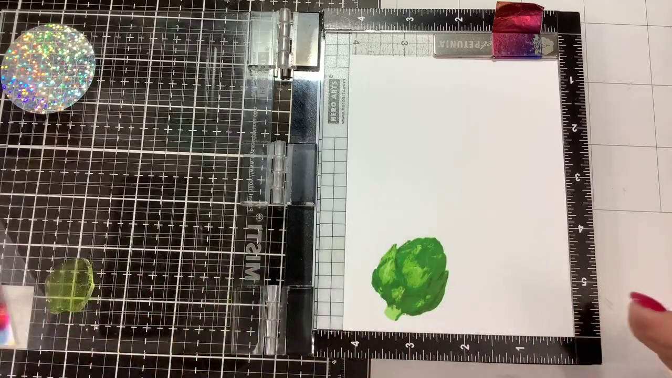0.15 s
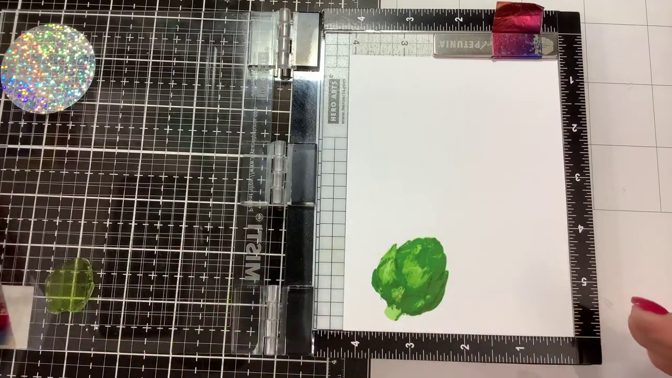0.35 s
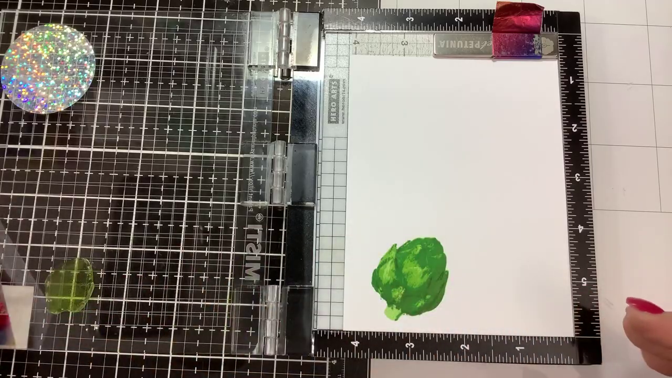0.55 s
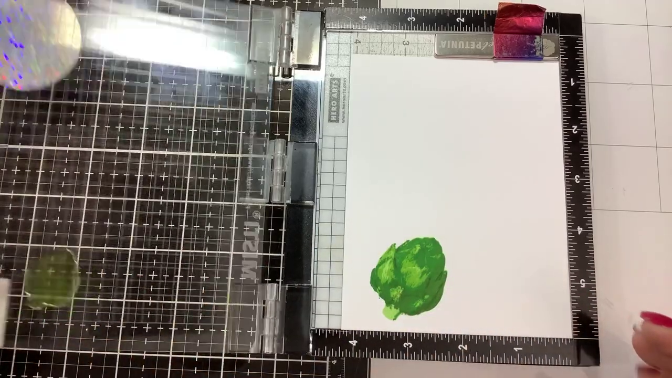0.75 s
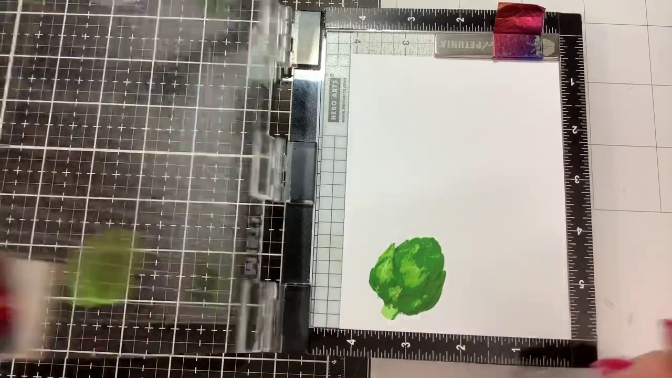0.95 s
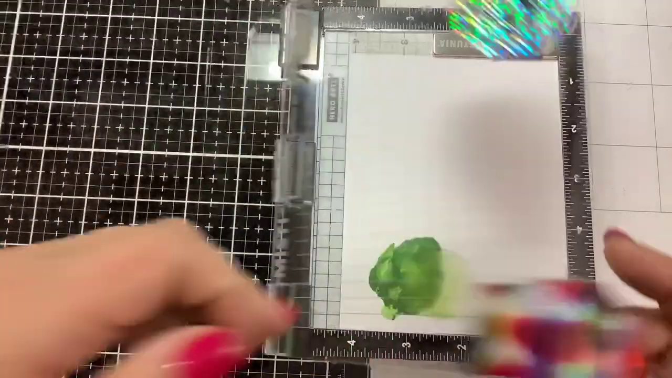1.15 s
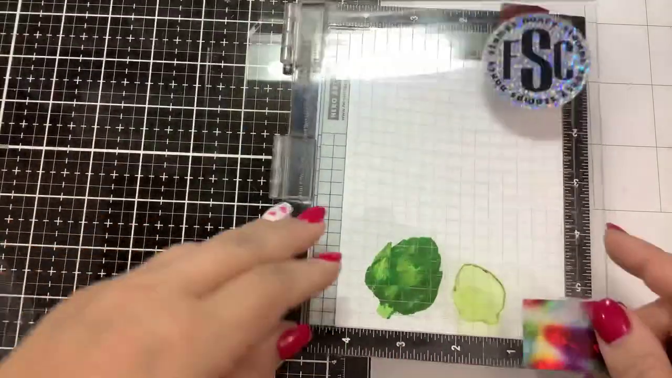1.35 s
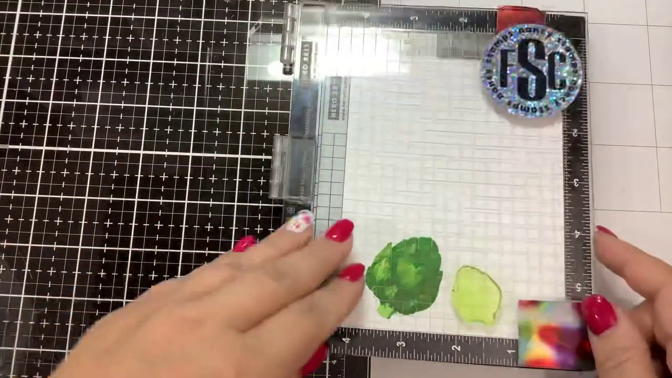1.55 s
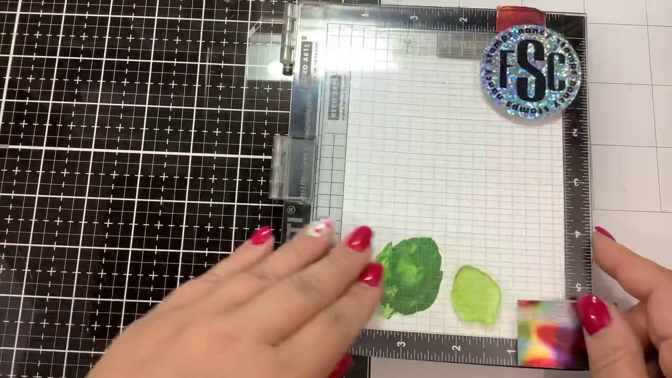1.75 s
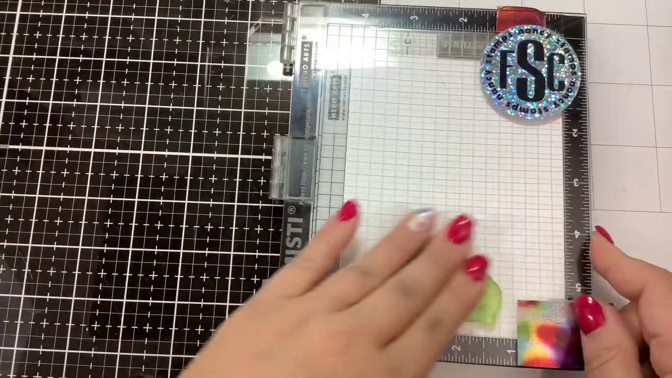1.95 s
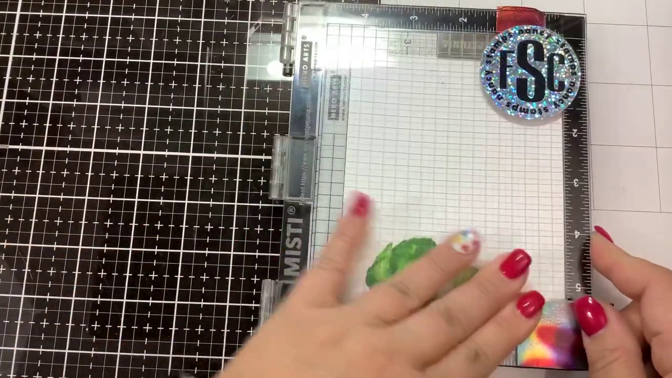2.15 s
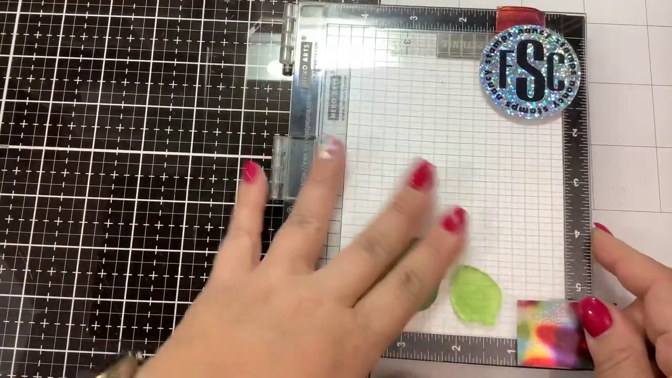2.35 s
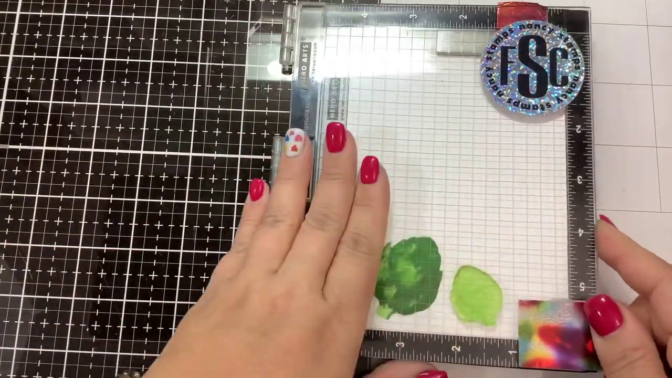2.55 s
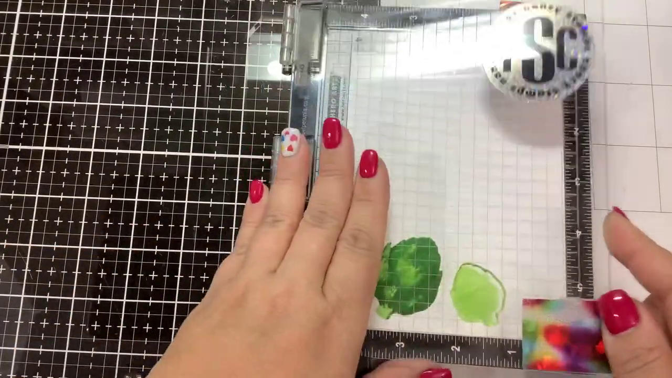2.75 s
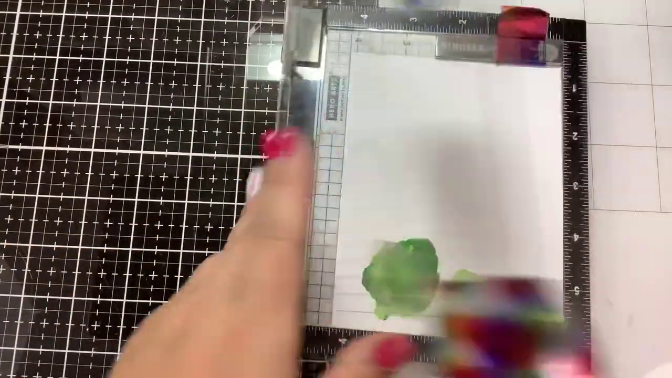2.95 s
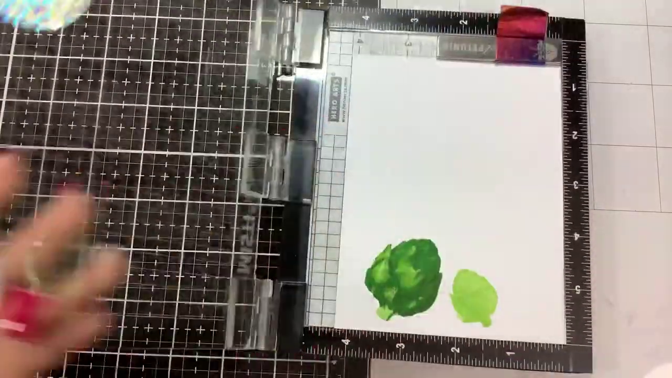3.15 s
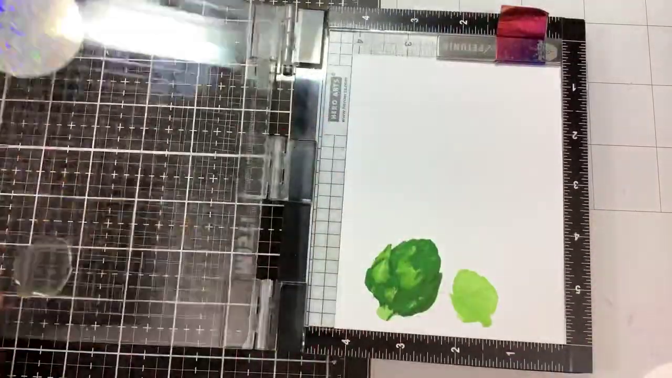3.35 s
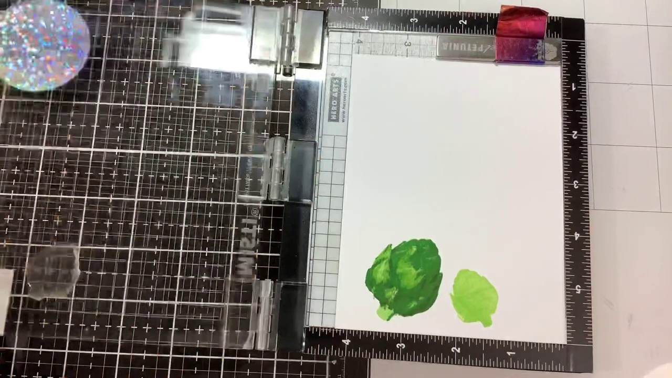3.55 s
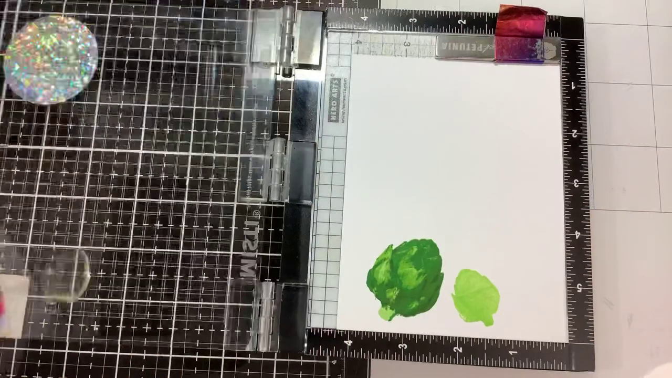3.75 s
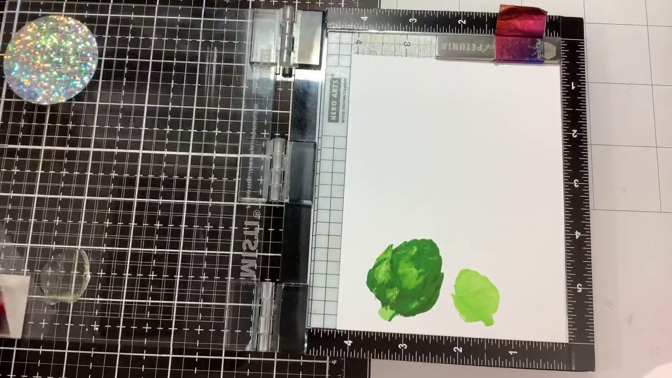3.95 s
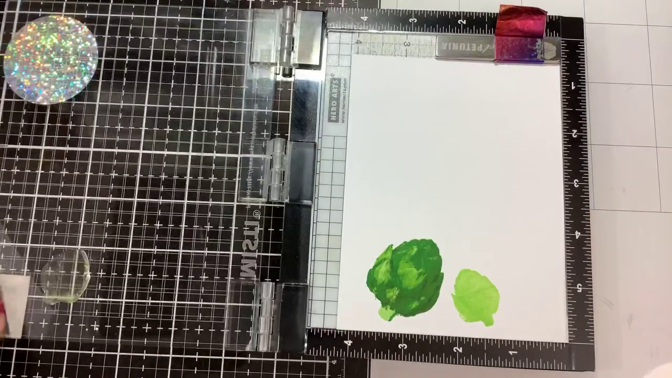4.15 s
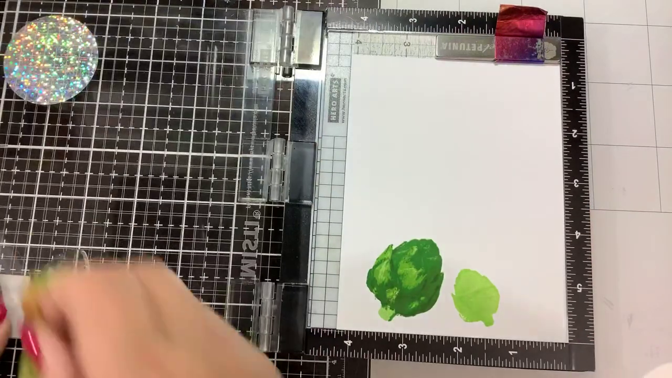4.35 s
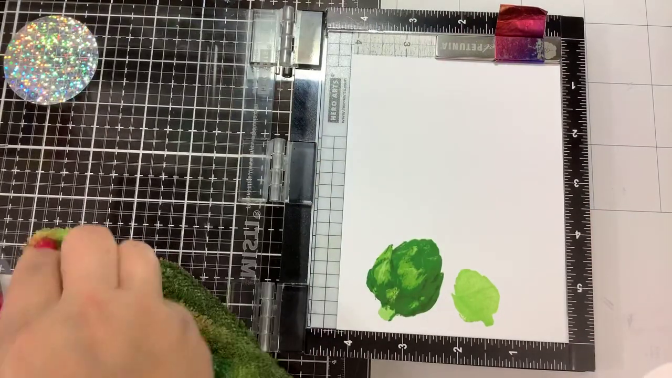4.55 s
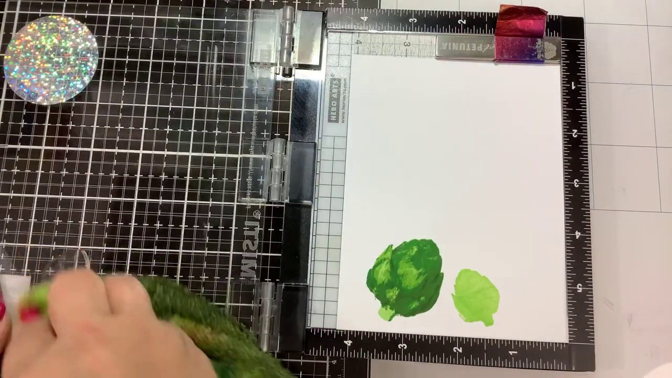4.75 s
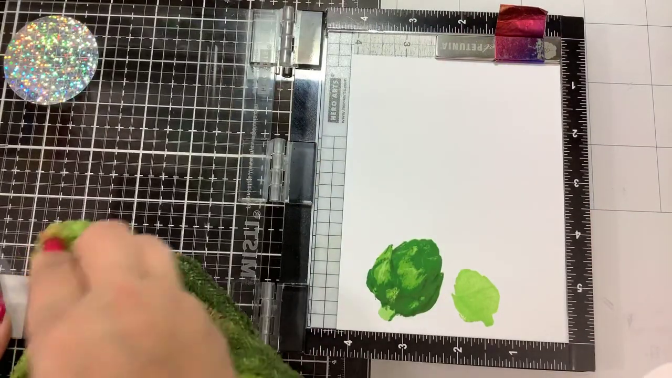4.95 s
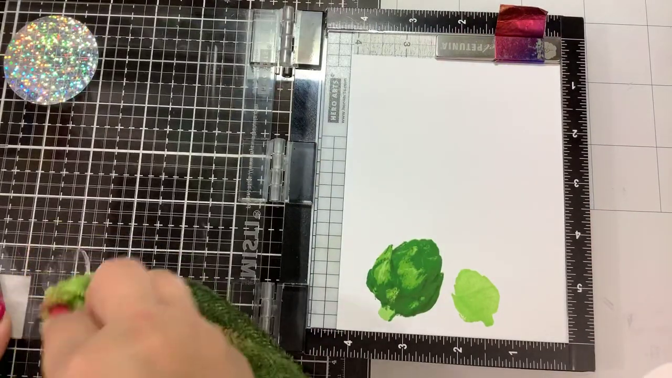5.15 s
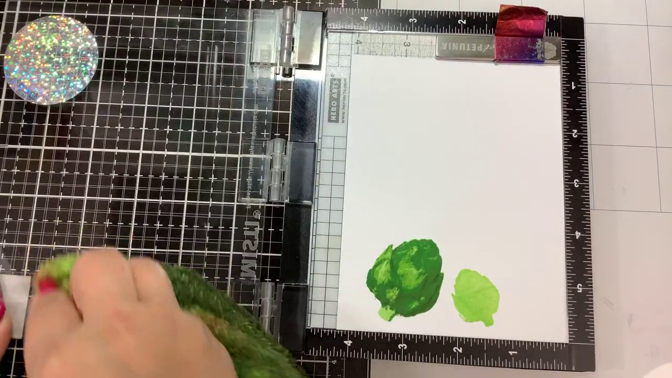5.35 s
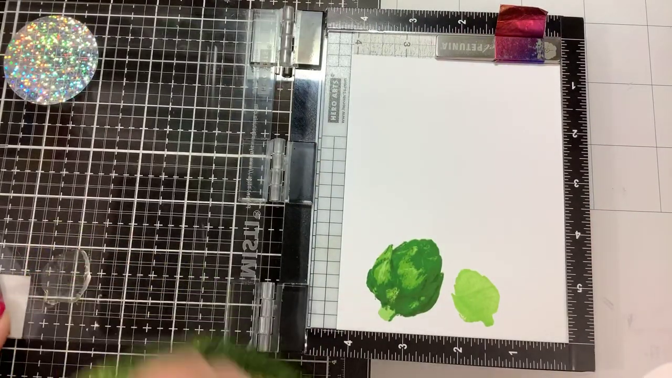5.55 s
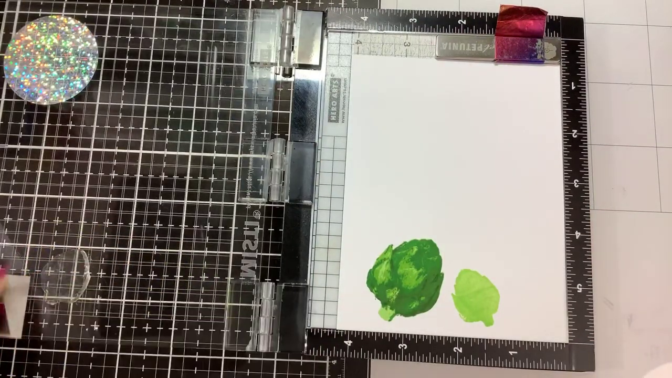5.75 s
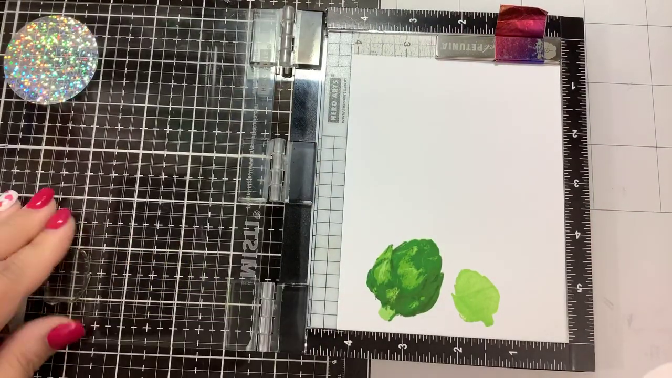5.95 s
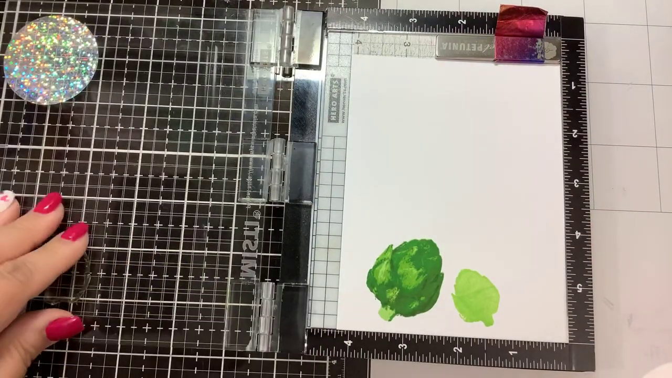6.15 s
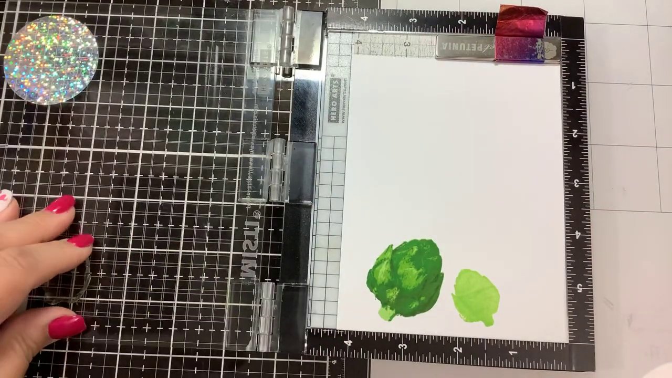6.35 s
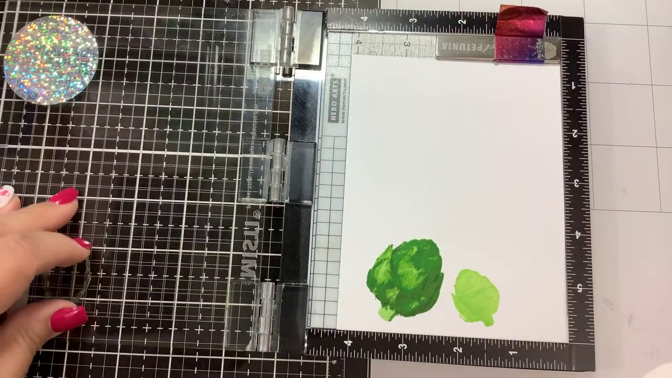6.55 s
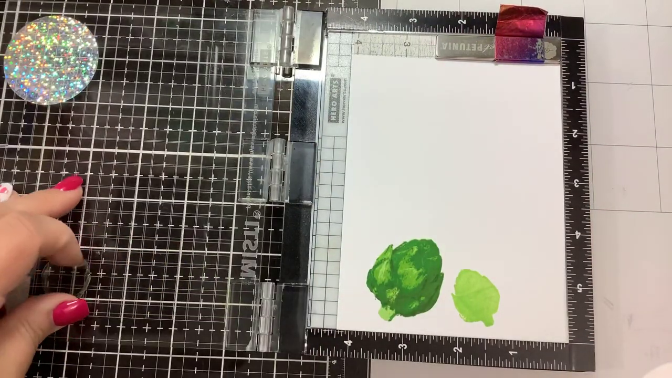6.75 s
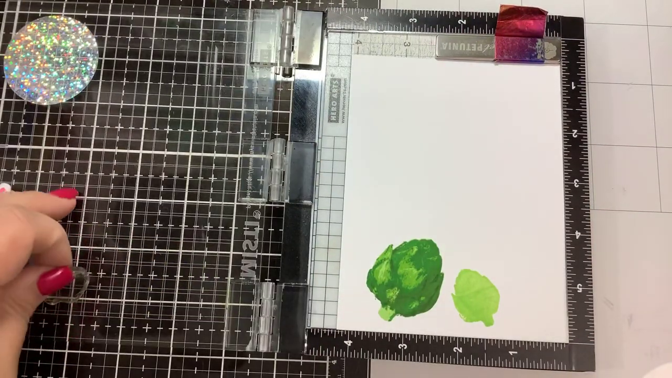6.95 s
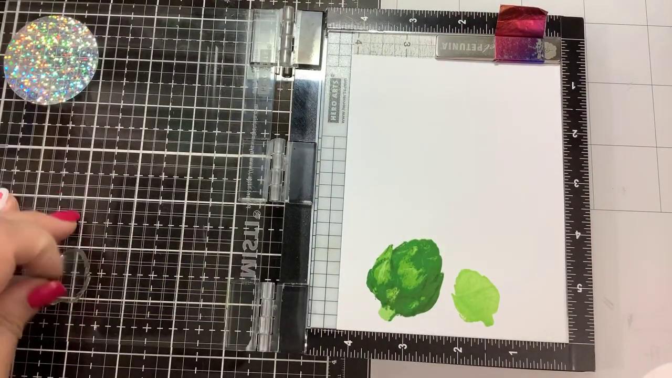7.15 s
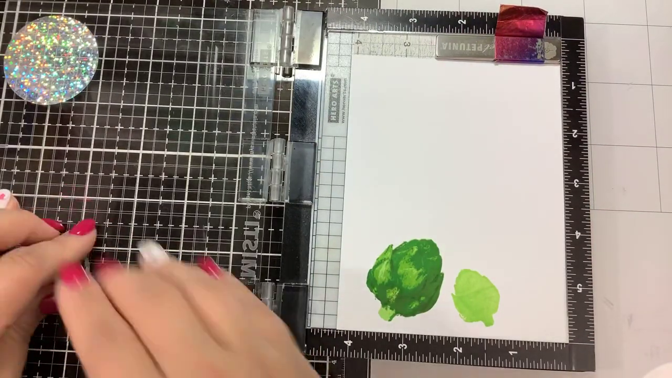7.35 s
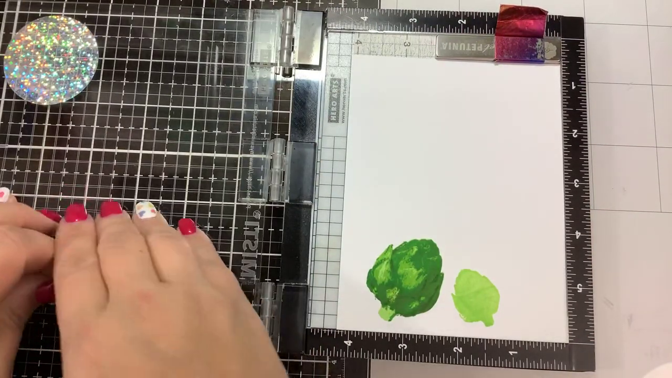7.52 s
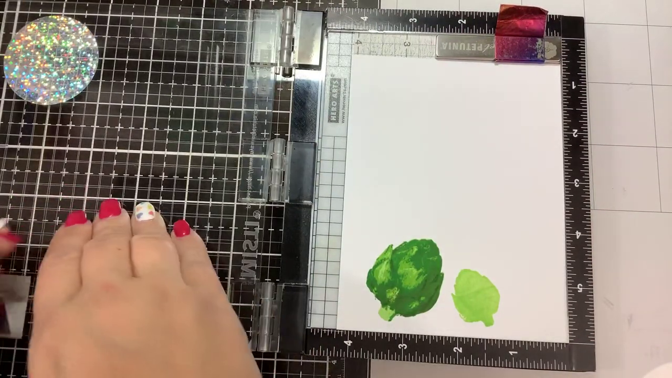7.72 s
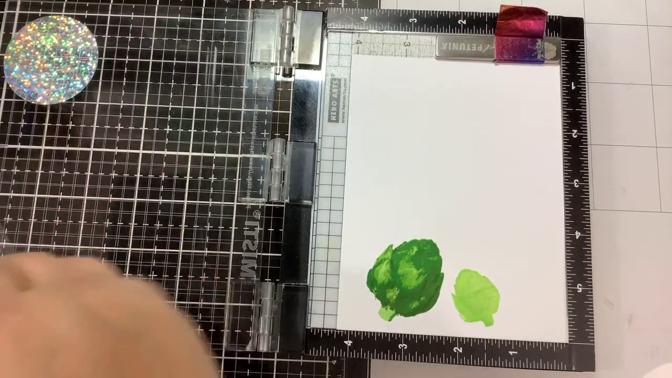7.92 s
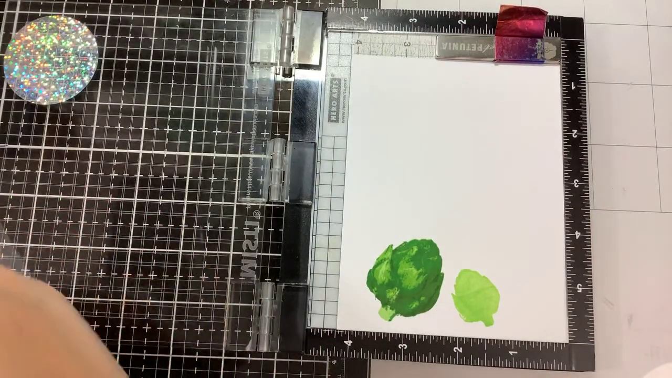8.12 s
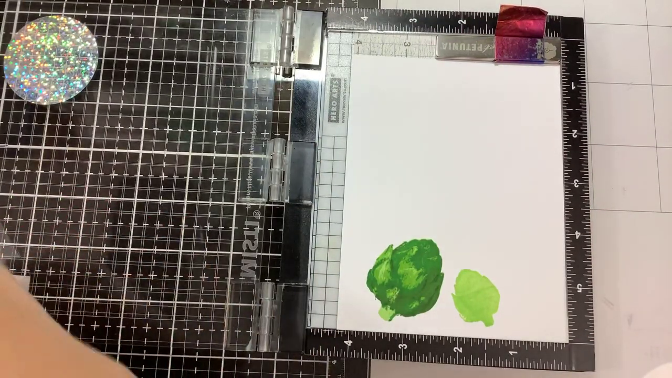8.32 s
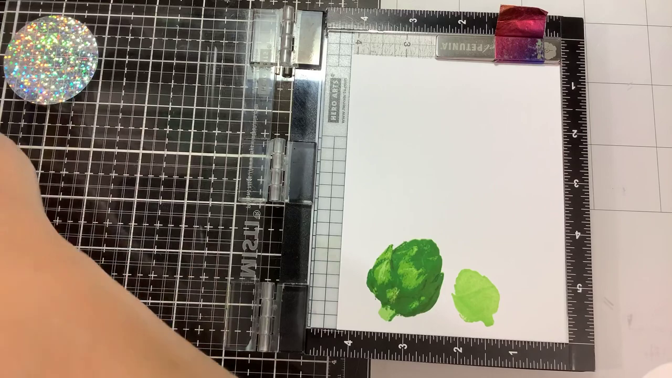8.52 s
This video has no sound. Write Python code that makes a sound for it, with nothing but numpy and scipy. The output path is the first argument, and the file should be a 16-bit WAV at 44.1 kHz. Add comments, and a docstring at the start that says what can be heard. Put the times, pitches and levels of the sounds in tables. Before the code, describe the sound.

A hinged clear plastic lid creaks and claps shut on a desk, fingers tap and rub it, then it squeals open with sharp clicks and soft wiping.

```python
"""Stamping platform on a desk

The clear lid of a hinged plastic platform creaks shut and claps down; fingers press and rub it. The stamp snaps
off the paper, the lid creaks open, a cloth wipes the stamp and nails pick it off and set it back with clicks.
Blows ring banks of resonances, stick-slip pulses make creaks and rubs, shaped noise makes strokes and brushes.
Mains hum and a faint hiss fill the small room."""
import sys
import numpy as np
from scipy import signal
from scipy.fft import rfft, irfft, next_fast_len
from scipy.io import wavfile

SR = 44100
rng = np.random.default_rng(int(sys.argv[2]) if len(sys.argv) > 2 else 0)


def transcribe(signal):
    """Save signal, clipped to [-1, 1], as a 16-bit WAV file at the path in sys.argv[1]."""
    frames = np.atleast_2d(signal).T
    limited = np.clip(frames, -1, 1)
    pcm = np.round(limited * 32767).astype(np.int16)
    wavfile.write(sys.argv[1], SR, pcm)


N = 382788
TIME = np.arange(N) / SR
# time and frequency axes of a single blow
SIZE = 16384
AGE = np.arange(SIZE) / SR
HZ = np.maximum(np.fft.rfftfreq(SIZE, 1 / SR), 1)


def from_db(db):
    """Decibels to gain."""
    return 10 ** (np.asarray(db) / 20)


def rms_one(x):
    """Scale to unit rms."""
    return x / np.sqrt(np.mean(x ** 2) + 1e-20)


def at_hz(points, hz):
    """Read a spectrum in dB on a log-frequency axis."""
    point_hz, db = np.transpose(points)
    return np.interp(np.log(hz), np.log(point_hz), db)


def add(out, s, sound):
    """Mix a sound in at time s."""
    i = max(0, int(round(s * SR)))
    out[i:i + len(sound)] += sound[:max(0, N - i)]


def noise(colour):
    """Steady noise of a given colour, rms 1."""
    size = next_fast_len(N)
    hz = np.maximum(np.fft.rfftfreq(size, 1 / SR), 1)
    spectrum = rfft(rng.standard_normal(size)) * from_db(at_hz(colour, hz))
    return rms_one(irfft(spectrum, size)[:N])


def drift(rate):
    """Random wandering between fresh values drawn rate times per second, with spread about 1."""
    return np.interp(TIME * rate, np.arange(4000), rng.standard_normal(4000))


def swells(rows):
    """Smooth bell-shaped rises and falls of level; length runs from the middle to 1/e of the peak."""
    return sum(from_db(db) * np.exp(-((TIME - s) / length) ** 2) for s, db, length in rows)


def causal(db):
    """Minimum-phase filter with the given gain, so that nothing sounds early."""
    cepstrum = irfft(np.log(from_db(db)))
    cepstrum[1:SIZE // 2] *= 2
    cepstrum[SIZE // 2 + 1:] = 0
    return np.exp(rfft(cepstrum))


def waveform(spectrum):
    """A blow in time, held to 0.15 s and then faded to silence by 0.3 s."""
    return irfft(spectrum) * np.clip(2 - 2 * AGE / .3, 0, 1)


def dying_noise(t60):
    """A burst of dense reflections with unit energy."""
    attack = 1 - np.exp(-AGE / (t60 / 20))
    burst = rng.standard_normal(SIZE) * from_db(-60 * AGE / t60) * attack
    return burst / np.linalg.norm(burst)


def body(modes, scatter_db, scatter_t60, room_db, room_t60):
    """Spectrum of one blow: the click and its echoes in plate and room, all coloured by the modes."""
    delay = np.exp(-2j * np.pi * HZ / SR)
    rings = 1
    for (hz, db, t60), chance in zip(modes, rng.standard_normal(len(modes))):
        r, w = from_db(-60 / (t60 * SR)), 2 * np.pi * hz / SR
        gain = from_db(db + chance) * (1 - r * r) / 2
        resonance = (1 - delay ** 2) / (1 - 2 * r * np.cos(w) * delay + (r * delay) ** 2)
        rings = rings + gain * resonance
    plate_echoes = from_db(scatter_db) * dying_noise(scatter_t60)
    room_echoes = from_db(room_db) * dying_noise(room_t60)
    return rings * (1 + rfft(plate_echoes + room_echoes))


def bending(desk_lag=.034, corner_hz=230, spread=.0013, air_share=0.88):
    """Bending waves are slower at low pitch; the bass arrives through the air, then again through the desk."""
    def delayed(lag):
        return np.exp(-2j * np.pi * np.cumsum(lag) * SR / SIZE)
    bass = 1 / (1 + (HZ / corner_hz) ** 4)
    plate = delayed(spread * (np.sqrt(5000 / (HZ + corner_hz)) - .4))
    through_air = 1 - (1 - air_share) * bass
    through_desk = bass * delayed(desk_lag / (1 + (HZ / corner_hz) ** 2))
    return plate * (through_air + through_desk)


def centres(edges):
    """Middle frequency of each band."""
    return np.sqrt(np.multiply(edges[:-1], edges[1:]))


def sloped(hz, corner_hz, below_db, above_db):
    """Colour of a contact in dB: one slope per octave up to a corner, another beyond it."""
    octaves = np.log2(hz / corner_hz)
    return octaves * np.where(octaves < 0, below_db, above_db)


def blow(spectrum, levels_db, edges):
    """Colour a blow by its contact; levels are band rms over 20 ms."""
    log_hz = np.log(centres(edges))
    bins, gains = np.searchsorted(HZ, edges), np.zeros(len(log_hz))
    tilt = -10 * np.log10(1 + (edges[0] / HZ) ** 4)  # rolls off below the lowest band
    for _ in range(3):  # home in on the band levels
        power = np.abs(spectrum * from_db(tilt + np.interp(np.log(HZ), log_hz, gains))) ** 2
        energy = np.add.reduceat(power, bins)[:-1] * 2 / SIZE / (.02 * SR)
        gains = gains + levels_db - 10 * np.log10(energy)
        gains = np.maximum(gains, gains.max() - 50)
    return spectrum * causal(tilt + np.interp(np.log(HZ), log_hz, gains))


def strike(spectrum, octave_db, edges):
    """One blow in time, from its level per octave in each band."""
    band_db = octave_db + 10 * np.log10(np.diff(np.log2(edges)))
    return waveform(blow(spectrum, band_db, edges))


def run_of_slips(start, end, per_s, first_db, last_db):
    """Nearly even slips that grow or fade: rows (time [s], level [dB])."""
    count = int(round((end - start) * per_s)) + 1
    even = np.linspace((start, first_db), (end, last_db), count)
    return even + rng.standard_normal((count, 2)) * [0.0007, 1.0]  # jitter [s], level spread [dB]


def stick_slip(rows, spectrum, split_hz):
    """A surface sticks and lets go repeatedly; longer holds slip harder, sharper slips have more treble."""
    s, rate, level_db, treble_db, rough = np.transpose(rows)
    age = np.arange(int((s[-1] - s[0]) * SR) + 2)
    dull, sharp, t = np.zeros(len(age)), np.zeros(len(age)), s[0]
    for chance in rng.uniform(-2, 2, 200):
        per_s, db, treble, shake = (np.interp(t, s, column) for column in (rate, level_db, treble_db, rough))
        hold = np.exp(min(shake, .5) * chance)
        t += hold / per_s
        if t >= s[-1]:
            break
        pulse = np.sinc(age - (t - s[0]) * SR)  # lands between samples
        slip = pulse * from_db(db) * hold * np.sqrt(SR / per_s)
        dull += slip / np.hypot(1, from_db(treble))
        sharp += slip / np.hypot(1, from_db(-treble))
    out = 0
    for slips, kind in ((dull, "low"), (sharp, "high")):
        split = signal.butter(8, min(split_hz, .4 * SR), kind, fs=SR, output="sos")
        ring = signal.sosfilt(split, waveform(spectrum))
        out = out + signal.fftconvolve(slips, ring / np.linalg.norm(ring))
    return out


# hum partials: (frequency [Hz], mean level [dB rms])
HUM_PARTIALS = [(59.3, -60), (84.5, -72), (119.5, -71.5), (295, -70)]
# hiss spectrum: (frequency [Hz], relative level per Hz [dB])
HISS_COLOUR = [(20, -8), (32, 3), (50, 3), (85, 4.5), (125, -3), (170, -4.5), (250, -10), (420, -16.5),
               (1000, -21.5), (1300, -20.5), (3200, -25), (7000, -23.5), (11500, -19), (15800, -25.5)]


def room(waver_db=0.5, wander=0.31, hiss_db=-59):
    """Hum partials that waver slightly in level and phase [rad], over steady hiss."""
    hum = np.zeros(N)
    for hz, db in HUM_PARTIALS:
        level = from_db(db + waver_db * drift(5.5))
        hum += level * np.sqrt(2) * np.sin(2 * np.pi * hz * TIME + wander * drift(9.8))
    return hum + from_db(hiss_db) * noise(HISS_COLOUR)


# ringing of the whole platform on the desk; each blow varies the levels a little:
# (frequency [Hz], typical level over the bare click [dB], t60 [s])
PLATFORM_RINGS = [(137, 17, 0.11), (168, 11.5, 0.067), (212, 13.5, 0.08), (289, 8, 0.13), (404, 6, .12),
                  (624, 8.5, 0.064), (814, 1.5, 0.081), (1064, -5.5, 0.078), (1178, 2, 0.078),
                  (1335, 3, 0.051), (1743, 4, .08), (1784, -1, .05), (2064, 0.5, 0.07), (2500, -4.5, .06),
                  (2703, -2, .07), (2895, 1, 0.024), (3050, -0.5, .06), (4060, -3.5, .05),
                  (4420, -2, 0.058), (4590, -1, .03), (5500, -5.5, 0.012), (5880, 1, 0.035),
                  (6060, -6, 0.011), (6869, -3, .04)]
# contact colour band edges: (frequency [Hz])
TOUCH_BANDS = [70, 350, 1200, 4000, 16000]


def touches(rows):
    """Light contacts on the platform: soft fingertips are strongest at a low pitch, hard nails at a high one."""
    out, path = np.zeros(N), bending()
    for s, db, contact_hz in rows:
        struck = body(PLATFORM_RINGS, scatter_db=1.0, scatter_t60=.028, room_db=-7.5, room_t60=0.2)
        colour = sloped(centres(TOUCH_BANDS), contact_hz, below_db=4.5, above_db=-8)
        add(out, s, strike(struck * path, db + colour, TOUCH_BANDS))
    return out


# fingertip and nail touches: (time [s], level per octave at the contact pitch [dB], contact pitch [Hz])
TOUCHES = [(0.001, -42, 3560), (0.4343, -56.5, 1940), (1.3901, -56, 1300), (1.433, -61, 4000),
           (1.5234, -54.5, 12000), (1.542, -52.5, 6100), (1.776, -47, 4000), (1.9899, -48.5, 2560),
           (2.0103, -61, 1300), (2.3625, -53, 4000), (2.5741, -47.5, 4000), (2.6076, -50, 2700),
           (2.686, -48, 1890), (2.8412, -61.5, 11000), (4.1775, -58, 2400), (4.2235, -56, 7000),
           (4.6872, -58, 7000), (4.8854, -59.5, 1640), (5.2147, -62.5, 1770), (5.5558, -57, 1000),
           (6.2309, -59.5, 710), (6.3557, -57.5, 1070), (6.6352, -50.5, 1000), (6.8386, -60, 11000),
           (6.9455, -54.5, 990), (7.4272, -57, 697), (7.453, -46, 6000), (7.4979, -52.5, 6000),
           (7.5537, -50.5, 6950), (7.5667, -45.5, 5960), (7.5884, -44.5, 5500), (7.594, -46.5, 11000),
           (7.7739, -50.5, 5000), (7.8138, -46.5, 5670), (8.6011, -60, 2510)]


def taps():
    """Fingertips and nails tap the platform, setting its resonances ringing."""
    return touches(TOUCHES)


# the desk bumped by the hands, and at 3.755 s still rocking after the knock just before: (time at the middle
# [s], peak level [dB], middle to 1/e [s])
DESK_BUMPS = [(0.01, -40, 0.017), (0.83, -51.5, 0.026), (0.906, -47.5, 0.024), (1.425, -58.5, 0.035),
              (2.124, -47.5, 0.03), (2.597, -51.5, 0.04), (3.755, -45.5, 0.023), (4.62, -64, 0.11),
              (5.392, -53, 0.041), (5.556, -56.5, 0.024), (6.53, -52.5, 0.14), (7.44, -53, 0.016),
              (7.61, -51, 0.04)]
# low desk noise: (frequency [Hz], relative level per Hz [dB])
DESK_COLOUR = [(35, -6.5), (90, -5.5), (170, 5.5), (240, -6), (400, -28.5), (1000, -56.5)]


def desk_bumps(lag_s=0.023, rock_s=0.025, rock_db=-7.5):
    """The desk swells low under the hands, and rocks just after each knock in proportion to its thump."""
    rocking = [(s + lag_s, thump_db + rock_db, rock_s) for s, _, _, _, thump_db, *_ in LOUD_KNOCKS]
    return swells(list(DESK_BUMPS) + rocking) * noise(DESK_COLOUR)


# knocks and snaps, each spot struck favouring a resonance of its own, with the colour sloping up to it and on:
# (time [s], level per octave at the spot before the shared colour [dB], slope below the spot [dB per octave],
#  slope above it [dB per octave], desk thump before colour [dB], scattered echoes over the click [dB],
#  spot pitch [Hz], typical spot level over the bare click [dB], spot t60 [s])
LOUD_KNOCKS = [(0.081, -17, 9.5, -4.5, -42, -5, 1910, -3.5, 0.046),
               (0.347, -42, 3, 1.5, -57, -3, 2840, 0, 0.021),
               (1.132, -21.5, 8, -8, -34, -15.5, 5720, 11.5, 0.0058),
               (2.5591, -42.5, 4, -1, -58, 1, 2900, -4, 0.05),
               (3.151, -23.5, 8, -4, -31.5, 0, 5340, 8, 0.0086),
               (3.71, -38, 5, 2.5, -46, -5, 1680, 22, 0.16),
               (7.0264, -33.5, 7, -19.5, -46, -4, 2040, 3, 0.012),
               (7.2657, -32, 14, 1.5, -58.5, -9.5, 1930, 14, 0.0075),
               (7.612, -44, 2.5, 0.6, -49, 0.5, 1400, 4, 0.038)]
# contact colour band edges: (frequency [Hz])
KNOCK_BANDS = [70, 180, 400, 1550, 2200, 3400, 4800, 7000, 16000]
# shared by all knocks: (frequency [Hz], gain [dB])
SHARED_KNOCK_COLOUR = [(110, -1.5), (800, -1), (1850, 0.5), (2700, -1), (4000, -2.5), (5800, 1.5),
                       (10500, 1.5)]
# low thump of the desk: (frequency [Hz], relative level per octave [dB])
DESK_THUMP_COLOUR = [(110, -1), (270, -2.5), (800, -3), (2000, -10.5), (10000, -59.5)]


def chatter(chatter_db=-3, t60=0.01):
    """Two hard faces rattle against each other for a moment before they settle."""
    return 1 + rfft(from_db(chatter_db) * dying_noise(t60)) * HZ / (HZ + 5000)


def knocks():
    """Hard blows ring the platform and the struck spot, with chatter on top and a desk thump below."""
    out, path, hz = np.zeros(N), bending(), centres(KNOCK_BANDS)
    for s, db, below_db, above_db, thump_db, scatter_db, spot_hz, spot_db, spot_t60 in LOUD_KNOCKS:
        modes = list(PLATFORM_RINGS) + [(spot_hz, spot_db, spot_t60)]
        struck = body(modes, scatter_db, scatter_t60=0.044, room_db=-14.0, room_t60=0.1)
        contact = from_db(db + sloped(hz, spot_hz, below_db, above_db))
        thump = from_db(thump_db + at_hz(DESK_THUMP_COLOUR, hz))
        octave_db = 20 * np.log10(np.hypot(contact, thump)) + at_hz(SHARED_KNOCK_COLOUR, hz)
        add(out, s, strike(struck * chatter() * path, octave_db, KNOCK_BANDS))
    return out


# strokes of hand and cloth over the plastic, before the trims and the uneven catching:
# (time at the middle [s], middle to 1/e [s], dull drag [dB], swish [dB])
HAND_STROKES = [(0.39, 0.041, -65, -55.5), (0.53, 0.054, -62, -50.5), (1.352, 0.29, -71, -67.5),
                (2.112, 0.21, -61.5, -57.5), (2.535, 0.22, -69.5, -62.5), (2.8, 0.037, -64, -53),
                (4.156, 0.25, -65.5, -58), (4.595, 0.28, -69, -63.5), (5.22, 0.3, -71.5, -66.5),
                (5.681, 0.19, -69, -58), (6.5, 0.34, -71, -76), (7.284, 0.26, -71, -67),
                (7.633, 0.056, -87, -57.5), (8.353, 0.3, -75, -74.5)]
# dull drag noise: (frequency [Hz], relative level per Hz [dB])
DULL_DRAG_COLOUR = [(300, -8), (650, 2), (1200, 0.5), (1800, -2), (2600, -3.5), (4500, -16.5)]
# soft swish noise: (frequency [Hz], relative level per Hz [dB])
SOFT_SWISH_COLOUR = [(2000, -4.5), (3500, -2), (6000, 2.5), (9000, -1), (12000, 4), (16000, -3.5)]


def sliding(drag_db=-2, swish_db=-3, grain_db=6.0, grain_rate=150, pressure_db=2.5, pressure_rate=25):
    """Skin and cloth catch unevenly on the plastic: a grainy drag and a soft swish."""
    drag = swells([(s, db + drag_db, length) for s, length, db, _ in HAND_STROKES])
    swish = swells([(s, db + swish_db, length) for s, length, _, db in HAND_STROKES])
    catch = grain_db * drift(grain_rate) + pressure_db * drift(pressure_rate)
    grainy_drag = drag * from_db(catch) * noise(DULL_DRAG_COLOUR)
    soft_swish = swish * from_db(catch / 2) * noise(SOFT_SWISH_COLOUR)
    return grainy_drag + soft_swish


# the hinge sticks, then gives with a single jerk: (time [s], level before colour [dB], sharpness [0-1])
HINGE_JERKS = [(0.602, -41.5, 1), (0.6179, -39, 0.08), (0.628, -40.5, 0), (0.6378, -37.5, 0.9),
               (0.6556, -45, 0), (0.706, -41.5, 0.95), (0.9317, -47.5, 0.5), (3.279, -38.5, 0.76),
               (3.5091, -39.5, 1), (3.5158, -42.5, 0.23), (3.5324, -44, 0.76), (3.55, -47.5, 0),
               (3.5824, -40, 1)]
# turning slowly, its knuckles ratchet at a nearly even pace:
# (start [s], end [s], slips [per s], first level before colour [dB], last level [dB], sharpness [0-1])
HINGE_RATCHETS = [(0.671, 0.693, 103, -43, -42, 0.8), (0.7233, 0.7603, 82, -39.5, -42.5, 0.8),
                  (3.2317, 3.261, 66, -46.5, -43, 0.44), (3.294, 3.307, 74, -41, -44, 0.6),
                  (3.365, 3.4412, 64, -45.5, -43.5, 0.39), (3.6025, 3.6713, 43, -43, -43.5, 0.21),
                  (3.609, 3.662, 38, -46, -45.5, 0.9)]
# ringing of the lid driven from the hinge: (frequency [Hz], typical level over the bare click [dB], t60 [s])
LID_RINGS = [(647, 11.5, 0.114), (1130, -12.5, 0.14), (1436, 6, 0.015), (1666, 3.5, 0.038),
             (2330, 11.5, 0.026), (2500, -16, 0.031), (3230, -13.5, .03), (3980, -10, 0.09),
             (5500, -6, 0.016), (7000, -2, .012), (11700, 3.5, 0.0012)]
# slip colour band edges: (frequency [Hz])
SLIP_BANDS = [450, 1200, 3000, 7000, 16000]
# colour of a dull slip: (frequency [Hz], relative level per octave [dB])
DULL_COLOUR = [(730, -10.5), (1900, -1.5), (4600, -10), (10500, -13)]
# colour of a sharp slip: (frequency [Hz], relative level per octave [dB])
SHARP_COLOUR = [(730, -16.5), (1900, -10), (4600, -5), (10500, 0.5)]


def hinge_slips():
    """Separate slips of the hinge, alone or ratcheting, each ring the lid."""
    out, path, hz = np.zeros(N), bending(), centres(SLIP_BANDS)
    ratchets = [(s, db, sharp) for *row, sharp in HINGE_RATCHETS for s, db in run_of_slips(*row)]
    for s, db, sharp in list(HINGE_JERKS) + ratchets:
        lid = body(LID_RINGS, scatter_db=2, scatter_t60=0.018, room_db=-5.5, room_t60=0.18)
        colour = (1 - sharp) * at_hz(DULL_COLOUR, hz) + sharp * at_hz(SHARP_COLOUR, hz)
        add(out, s, strike(lid * path, db + colour, SLIP_BANDS))
    return out


# a swinging lid is held by the hand, which damps it to broad resonances:
# (frequency [Hz], typical level over the bare click [dB], t60 [s])
HELD_LID_RINGS = [(652, -3, 0.03), (1430, -5.5, 0.022), (2410, -9.5, .025), (3280, 5, .018),
                  (3810, 6, 0.051), (5290, 11.5, 0.0043), (11900, -17, 0.0021)]
# filter on the held lid: (frequency [Hz], gain [dB])
LID_COLOUR = [(200, -22.5), (600, 1), (1400, 1), (2400, 5), (3400, 1.5), (4300, -2.5), (6000, -12.5),
              (12500, -4.5), (16000, -19)]


def lid_creak(rows):
    """A fast run of slips sets the held lid ringing."""
    lid = body(HELD_LID_RINGS, scatter_db=4.0, scatter_t60=0.013, room_db=1, room_t60=0.1)
    return stick_slip(rows, lid * causal(at_hz(LID_COLOUR, HZ)) * bending(), split_hz=6500)


# creaks, each a list of breakpoints:
# (time [s], slips [per s], level [dB], treble over bass [dB], roughness [0-1])
CREAKS = [
    [(.770, 164, -41.5, -1, 0.07), (.79, 190, -42, -3, 0.03), (.82, 410, -44.5, -8, 0.04),
     (.845, 540, -52, -11, 0.16), (.87, 910, -51.5, -1, 0.28), (.89, 530, -43, 0, 0.29),
     (.905, 860, -49, -34, 0.17), (.928, 500, -69, -22, 0)],
    [(3.063, 400, -39, -10, 0.19), (3.068, 490, -41.5, -20, 0), (3.085, 193, -44, -14, 0.18),
     (3.11, 150, -42.5, -13, 0.21), (3.147, 67, -37, -15, 0)],
    [(3.17, 234, -41, -1, 0.19), (3.20, 170, -43, -8, 0.11), (3.228, 104, -41, 0, 0)],
    [(3.235, 300, -55, 0, 0.37), (3.30, 300, -42, 6, .4), (3.314, 204, -40, 0, .3),
     (3.34, 203, -46.5, -3, 0.27), (3.365, 140, -48, -1, 0.2), (3.44, 186, -50, 8, 0.2)],
    [(3.678, 200, -41.5, -3, 0.24), (3.706, 280, -68, 3, 0.1)],
]


def hinge_creaks():
    """Faster turning runs the hinge's slips into a creak or squeal."""
    out = np.zeros(N)
    for rows in CREAKS:
        add(out, rows[0][0], lid_creak(rows))
    return out


# faint ticks come by chance while the hands are busy: (start [s], end [s])
BUSY_SPANS = [(1.401, 2.8), (3.999, 4.5), (5.3, 5.7)]


def fidgets(per_s=4.2, level_db=-63, spread_db=0.5, low_hz=1460, high_hz=12000):
    """Faint ticks of fingers and nails at chance times and pitches within the busy spans."""
    rows = []
    for start, end in BUSY_SPANS:
        for when, force, hardness in rng.random((int((end - start) * per_s), 3)):
            db = level_db + spread_db * (2 * force - 1)
            contact_hz = low_hz * (high_hz / low_hz) ** hardness
            rows.append((start + when * (end - start), db, contact_hz))
    return touches(rows)


# fingers juddering on the platform, each rub a list of breakpoints:
# (time [s], slips [per s], level [dB], treble over bass [dB], roughness [0-1])
RUBS = [
    [(2.03, 265, -56.5, -26, 0.45), (2.083, 297, -53, -8, 0.3), (2.091, 196, -33.5, -11, 0.14),
     (2.135, 222, -38.5, -29, 0.22), (2.146, 320, -65, -20, 0.5)],
    [(2.27, 470, -45.5, -22, .3), (2.283, 310, -53, -29, 0.39), (2.30, 300, -82, -19, 0.3)],
    [(2.575, 400, -46.5, -7, 0.29), (2.61, 370, -58, -11, 0.37), (2.635, 200, -66, -14, 0.4)],
    [(2.72, 340, -62, -33, 0.37), (2.78, 510, -54.5, -5, 0.6), (2.82, 320, -69, 6, 0.62)],
    [(6.085, 950, -63, -25, .05), (6.11, 800, -59, -25, .055), (6.145, 630, -63, -25, .07)],
    [(6.44, 220, -76, -16, 0.65), (6.55, 210, -87, -16, 0.58), (6.68, 180, -72, -26, 0.45),
     (6.77, 175, -58.5, 7, 0.42), (6.83, 140, -97, -13, 0.6)],
]
# filter on the rubbed platform: (frequency [Hz], gain [dB])
RUBBED_COLOUR = [(100, -48), (200, -10.5), (380, 5), (600, -1), (850, 9), (1200, 16.5), (1600, 2),
                 (2500, -11), (5000, 1.5), (16000, 1)]


def finger_rubs():
    """Fingers judder across the platform by stick-slip and ring all of it."""
    out, path = np.zeros(N), bending()
    for rows in RUBS:
        platform = body(PLATFORM_RINGS, scatter_db=9.5, scatter_t60=0.016, room_db=-10.0, room_t60=0.13)
        rubbed = platform * causal(at_hz(RUBBED_COLOUR, HZ)) * path
        add(out, rows[0][0], stick_slip(rows, rubbed, split_hz=4000))
    return out


# cloth and sleeve brush softly past: (time at the middle [s], peak level [dB], middle to 1/e [s])
FABRIC_BRUSHES = [(2.13, -57, .025), (4.12, -58.5, 0.032), (4.53, -64, 0.066), (4.69, -63.5, 0.064),
                  (5.707, -45.5, 0.013), (6.55, -74.5, 0.16), (8.28, -73, 0.13), (8.52, -74.5, 0.1)]
# fabric noise: (frequency [Hz], relative level per Hz [dB])
FABRIC_COLOUR = [(600, -11), (1300, -10), (1800, -1), (2300, -10), (3500, -15), (8000, -23)]


def brushes():
    """Fabric brushes past in soft swells of noise."""
    return swells(FABRIC_BRUSHES) * noise(FABRIC_COLOUR)


# the hinge starts to open with a soft, falling squeal; the mix lifts the levels by 1 dB:
# (time [s], slips [per s], level before the lift [dB], treble over bass [dB], roughness [0-1])
HINGE_SQUEAL = [(2.975, 1000, -64, -45, .018), (2.988, 960, -59, -45, .018), (2.997, 860, -55.5, -45, .02),
                (3.02, 790, -49.5, -40, .03), (3.064, 640, -45, -35, .05)]


def hinge_squeal():
    """The hinge slips softly, so the squeal has no sharp top."""
    lid = body(HELD_LID_RINGS, scatter_db=17.0, scatter_t60=0.018, room_db=9, room_t60=0.21)
    out = np.zeros(N)
    squeal = stick_slip(HINGE_SQUEAL, lid * causal(at_hz(LID_COLOUR, HZ)), split_hz=4700)
    add(out, HINGE_SQUEAL[0][0], from_db(1.0) * squeal)
    return out


# the cloth drags off the tacky stamp:
# (time [s], slips [per s], level [dB], treble over bass [dB], roughness [0-1])
CLOTH_DRAG = [(5.690, 213, -49, -3, 0.39), (5.703, 310, -54, -10, 0.37), (5.724, 290, -56, 9, 0.4)]


def cloth_rub():
    """Cloth sticks and slips on the stamp, setting the held lid ringing."""
    out = np.zeros(N)
    add(out, CLOTH_DRAG[0][0], lid_creak(CLOTH_DRAG))
    return out


# a fingertip prises at the stamp in runs of dull ticks:
# (start [s], end [s], ticks [per s], first level [dB], last level [dB])
PRISING_RUNS = [(6.437, 6.561, 40, -61, -52), (6.74, 6.839, 33, -59.5, -54)]


def prising(contact_hz=750):
    """Nearly even, growing runs of soft fingertip ticks."""
    return touches([(s, db, contact_hz) for row in PRISING_RUNS for s, db in run_of_slips(*row)])


def scene():
    """All layers summed into one channel."""
    handling = taps() + fidgets() + prising() + knocks() + desk_bumps()
    hinge = hinge_slips() + hinge_creaks() + hinge_squeal()
    friction = sliding() + finger_rubs() + brushes() + cloth_rub()
    return (room() + handling + hinge + friction)[None]


def record(dry):
    """Any peaks past full scale clip, then a steep low-pass cuts the top above 16 kHz."""
    lowpass = signal.ellip(10, .2, 80, 16000, fs=SR, output="sos")
    return signal.sosfilt(lowpass, np.clip(dry, -1, 1))


dry = scene()
out = record(dry)
transcribe(out)
```